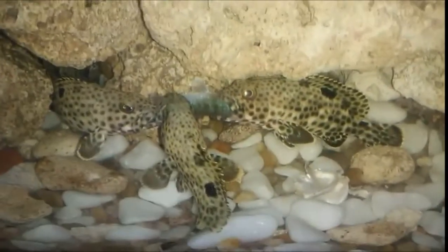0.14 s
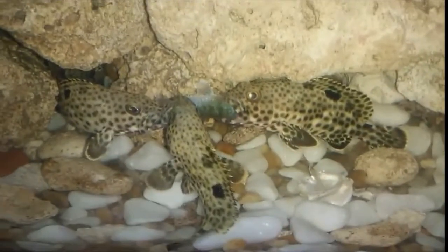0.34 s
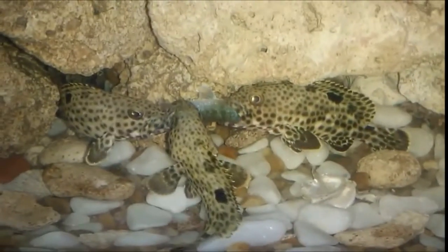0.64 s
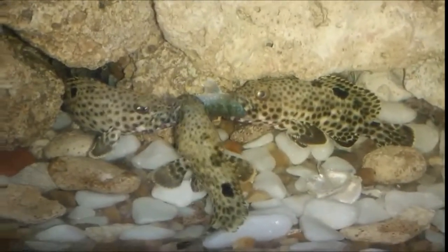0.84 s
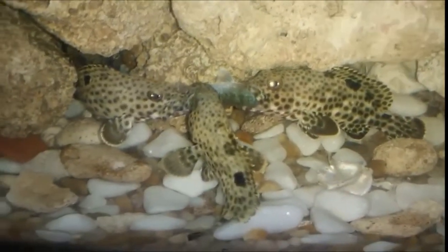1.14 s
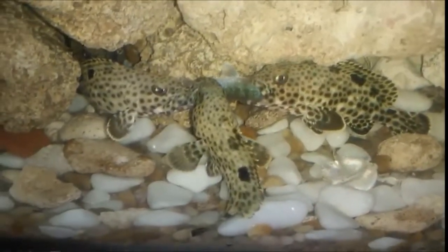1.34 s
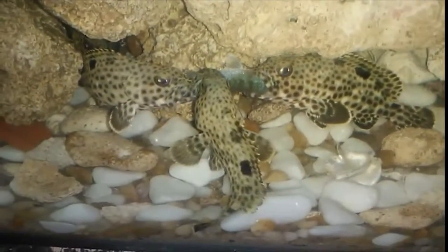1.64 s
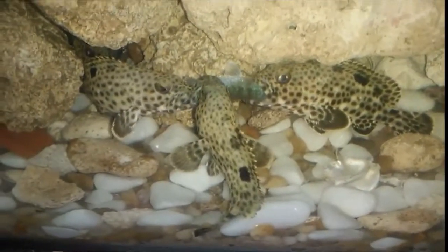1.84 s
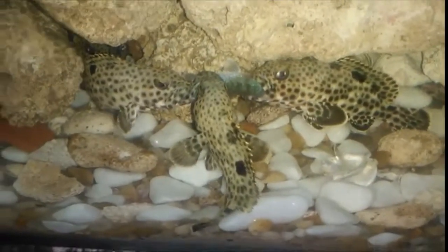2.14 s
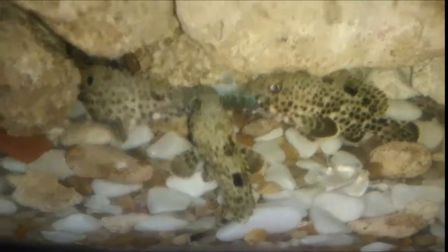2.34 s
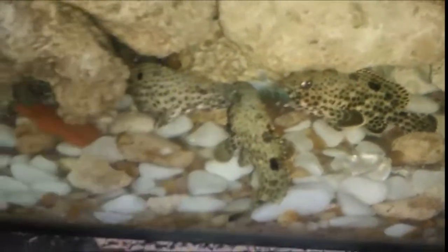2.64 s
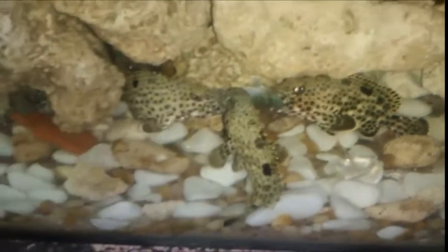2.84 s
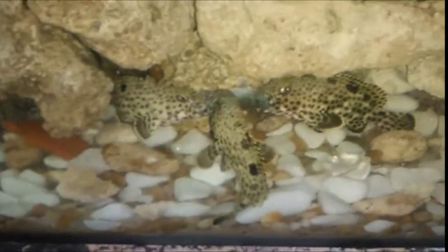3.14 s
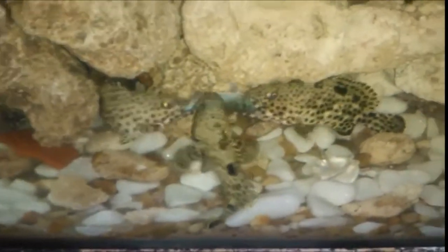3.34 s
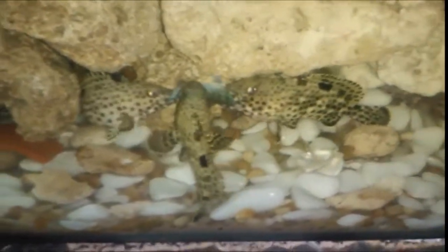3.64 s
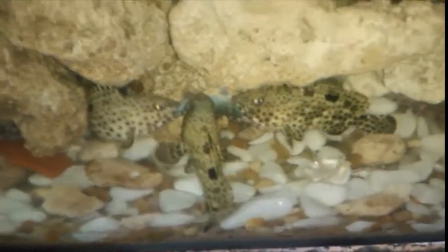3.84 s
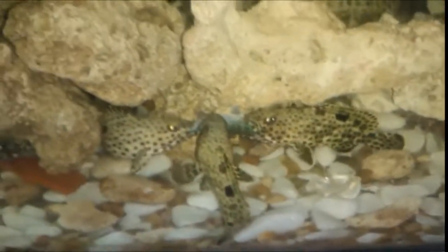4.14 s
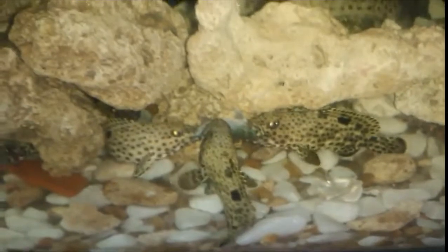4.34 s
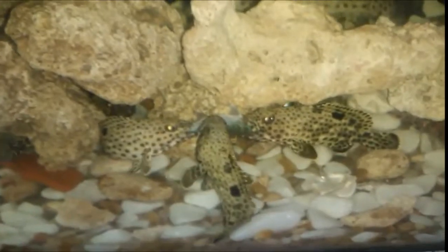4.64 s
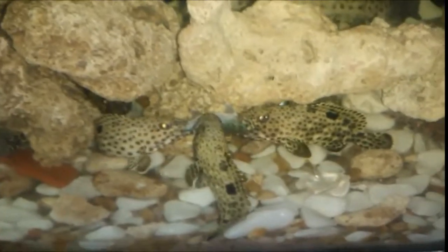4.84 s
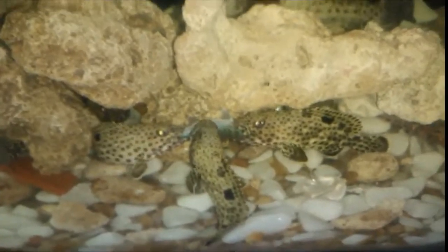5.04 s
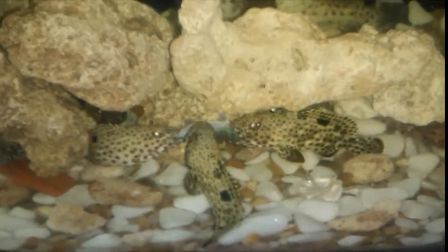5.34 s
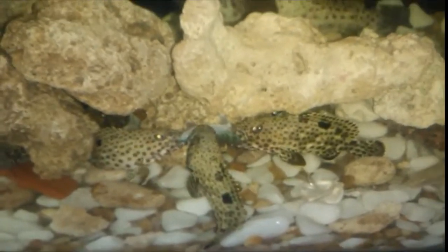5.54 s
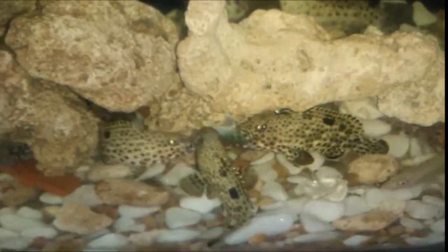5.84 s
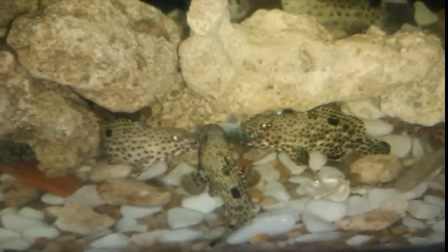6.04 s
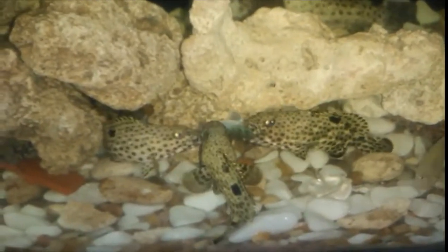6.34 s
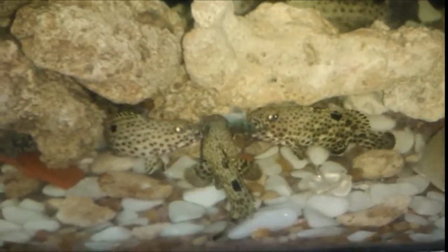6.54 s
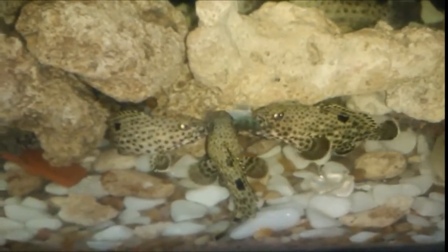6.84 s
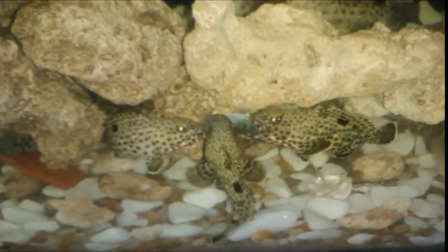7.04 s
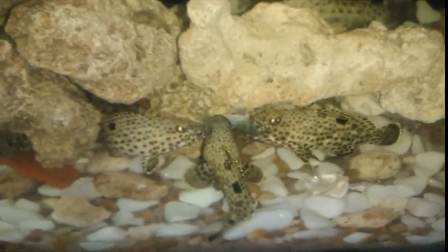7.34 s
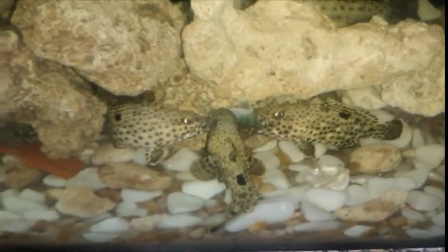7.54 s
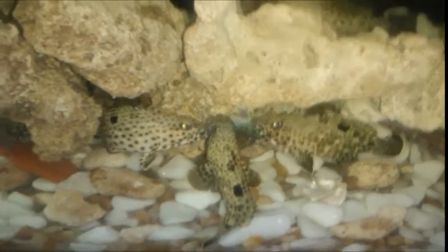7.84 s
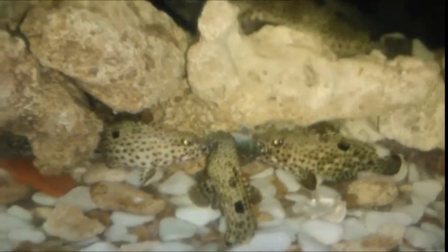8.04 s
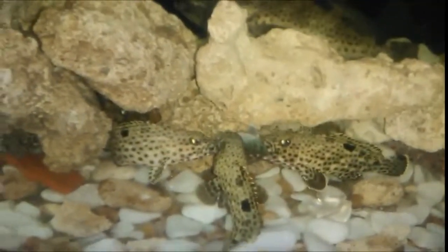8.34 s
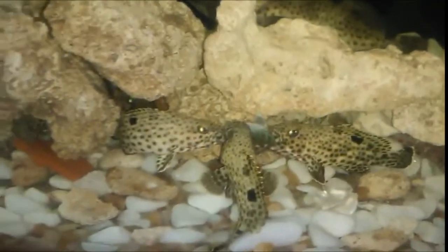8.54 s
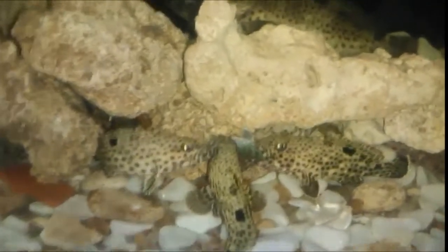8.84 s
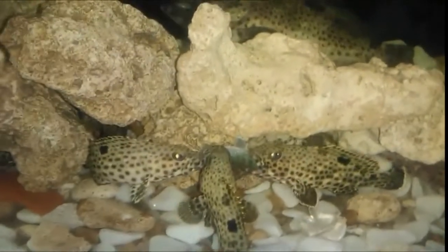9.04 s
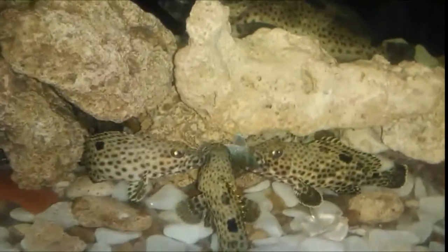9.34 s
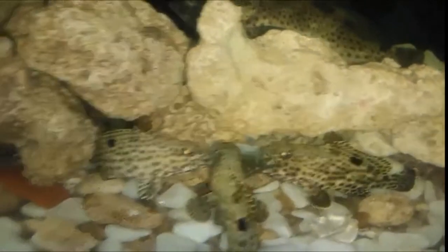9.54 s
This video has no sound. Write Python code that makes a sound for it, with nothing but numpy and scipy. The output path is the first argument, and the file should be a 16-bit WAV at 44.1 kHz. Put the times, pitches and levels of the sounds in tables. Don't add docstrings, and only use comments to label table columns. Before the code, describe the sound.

Aquarium filter water gurgles, trickles and splashes in a repeating short loop, left side only, with two silent gaps and one much louder pass.

```python
import sys
import numpy as np
from scipy import signal
from scipy.fft import rfft, irfft
from scipy.io import wavfile
from scipy.ndimage import uniform_filter1d, map_coordinates

SR = 44100
rng = np.random.default_rng(int(sys.argv[2]) if len(sys.argv) > 2 else 0)


def master(y):
    cut = np.clip(np.atleast_2d(y).T, -1, 1)
    pcm = np.round(cut * 32767)
    wavfile.write(sys.argv[1], SR, pcm.astype(np.int16))


def field_ratio(decibels):
    return 10 ** (np.asarray(decibels, dtype=float) / 20)


N = 426888
START, LENGTH = 6.55667, 1.8
M = round(LENGTH * SR)
T = np.arange(M) / SR

# start in seconds, gain in dB.
PASTES = [
    (-.94333, -9.5),
    (1.02334, -9.55),
    (2.65667, -9.55),
    (4.45667, -9.55),
    (6.55667, 0),
    (8.35667, -9.5),
]
# time in seconds, strength in dB, fineness in dB (small bubbles gain on large ones).
FLOW = [(6.56, -45.5, 0), (6.66, -47.5, -1), (6.74, -46, 1), (6.79, -45, 0.5), (6.82, -46, 2),
        (6.94, -46.5, -1), (7.1, -46.5, 0), (7.27, -46.5, 1.5), (7.335, -45.5, -1.5), (7.395, -47.5, -2.5),
        (7.455, -46, 1), (7.55, -46.5, -1.5), (7.75, -44.5, 0.5), (7.98, -47.5, -0.5), (8.12, -45, 0.5),
        (8.215, -45, -0.5), (8.29, -45.5, -1), (8.35, -45, 0.5)]
# time in seconds, top pitch in Hz, sag in Hz per second, spray level in dB.
TOP_STEPS = [(6.55, 4190, 100, 0), (6.665, 4500, 1180, 2), (6.809, 4350, 2400, 2), (6.993, 4430, 1500, -4.5),
             (7.24, 4640, 4500, -0.5), (7.311, 4765, 4440, 1.5), (7.44, 4160, 2500, 0.5),
             (7.495, 4420, 2560, 2.5), (7.592, 4810, 3510, -3.5), (7.702, 4820, 2500, -10.5),
             (7.771, 4543, 1700, 4.5), (8.04, 4450, 480, -0.5), (8.194, 4560, 300, 5)]
# middle in seconds, half length in seconds, loss in dB.
LULLS = [
    (6.662, 0.18, 1.5),
    (7.048, 0.11, 5),
    (7.244, 0.064, 4.5),
    (7.898, 0.059, 3),
    (8.219, 0.098, 1.5),
]

# frequency in Hz, density in dB per Hz.
GURGLE_COLOUR = [(165, -68), (185, -11), (250, -8.5), (330, -7), (500, -3.5), (637, -4), (850, -2.5),
                 (950, -23.5), (1100, -44)]
# frequency in Hz, density in dB per Hz.
TRICKLE_COLOUR = [(750, -45.5), (880, -12.5), (1000, -2.5), (1300, 0), (1600, -1.5), (1700, -18),
                  (1850, -43.5)]
# frequency in Hz, density in dB per Hz.
SPLASH_COLOUR = [(1450, -37.5), (1600, -7.5), (1860, -6), (2410, -5.5), (2800, -2), (3070, -7),
                 (3450, -4.5), (3600, -13), (3800, -47.5)]
# frequency in Hz, density in dB per Hz.
SPRAY_COLOUR = [(3400, -39), (3600, -5.5), (4160, -4.5), (4500, -14.5), (5200, -4), (5400, -61)]
# frequency in Hz, density in dB per Hz.
HISS_COLOUR = [(25, 0), (60, 2), (100, 4), (150, 8.5), (300, 8.5), (5000, 5.5), (9000, -3.5), (15700, -8),
               (16500, -41)]

# start in seconds,
# peak in dB, pitch in Hz, 60 dB decay in seconds.
DROPS = [(6.662, -28, 2626, 0.03), (6.675, -41.5, 2694, 0.12), (6.706, -29, 3240, 0.015),
         (6.707, -35, 3940, 0.033), (6.808, -34.4, 3240, 0.03), (6.812, -27.5, 3870, 0.015),
         (6.821, -29.5, 3690, 0.012), (7.147, -29, 2668, 0.03), (7.153, -22.5, 2767, 0.016),
         (7.246, -39.5, 3425, 0.06), (7.306, -37.5, 2693, 0.06), (7.312, -26, 2660, 0.015),
         (7.317, -32, 2910, 0.034), (7.318, -44, 3400, 0.13), (7.325, -39.5, 3890, 0.03),
         (7.333, -30, 2550, 0.015), (7.44, -40.5, 3590, 0.067), (7.487, -35.5, 3574, 0.017),
         (7.497, -39.5, 2993, 0.12), (7.589, -29, 3020, 0.015), (7.591, -25.5, 2788, 0.013),
         (7.609, -28.5, 3050, 0.03), (7.613, -24.5, 2800, 0.013), (7.642, -44, 3240, 0.12),
         (7.642, -37, 2982, 0.12), (7.647, -28, 2734, 0.03), (7.648, -20.5, 3094, 0.015),
         (7.649, -38.5, 3596, 0.06), (7.65, -28.5, 3262, 0.03), (7.653, -36, 3860, 0.015),
         (7.656, -41, 3530, 0.06), (7.695, -39, 3184, 0.12), (7.7, -35, 2562, 0.06),
         (7.6995, -25, 3150, 0.012), (7.7, -34.5, 3700, 0.017), (7.701, -35.5, 2971, 0.11),
         (7.702, -39.5, 2827, 0.12), (7.713, -44, 3305, 0.1), (7.722, -38, 3074, 0.13),
         (7.774, -40, 3552, 0.03), (7.826, -27.5, 2820, 0.014), (8.089, -43, 2906, 0.11),
         (8.097, -37.5, 3460, 0.03), (8.112, -40.5, 3420, 0.06), (8.18, -39.5, 2725, 0.06),
         (8.22, -42.5, 3860, 0.015), (8.284, -34.5, 3880, 0.015), (8.308, -39.5, 3930, 0.032),
         (8.349, -27, 2551, 0.015), (8.349, -25, 2970, 0.014),
         (6.601, -36, 2440, 0.028), (6.607, -40.5, 1953, 0.11), (6.617, -30, 2490, 0.015),
          (6.664, -35, 2340, 0.012), (6.665, -34, 2580, 0.012), (6.877, -32.5, 1810, 0.014),
          (6.925, -39.5, 2020, 0.03), (7.097, -31, 2550, 0.017), (7.147, -28.5, 2335, 0.017),
          (7.154, -32, 2420, 0.013), (7.239, -41.5, 1916, 0.12), (7.248, -43.5, 2350, 0.12),
          (7.307, -34.5, 2210, 0.018), (7.309, -29.2, 1793, 0.028), (7.311, -30.5, 2440, 0.035),
          (7.311, -26.5, 2092, 0.035), (7.317, -45, 1950, 0.042), (7.321, -38.5, 1716, 0.026),
          (7.331, -31.5, 2340, 0.012), (7.335, -37, 1842, 0.051), (7.341, -29.5, 2230, 0.018),
          (7.342, -37, 1720, 0.066), (7.353, -45, 1810, 0.12), (7.517, -42, 1754, 0.11),
          (7.576, -44, 1885, 0.12), (7.647, -34.5, 2510, 0.015), (7.649, -32, 1710, 0.015),
          (7.651, -34, 2280, 0.013), (7.7, -33.5, 2200, 0.012), (7.701, -42.5, 2260, 0.099),
          (7.704, -33.5, 2497, 0.012), (7.712, -33, 1790, 0.03), (7.719, -50.5, 2016, 0.076),
          (7.75, -36, 1720, 0.033), (7.91, -38, 1840, 0.036), (7.947, -36, 1970, 0.039),
          (8.042, -36.5, 1740, 0.1), (8.05, -40.5, 1626, 0.077), (8.052, -29.5, 2020, 0.017),
          (8.054, -42.6, 1478, 0.06), (8.074, -39.5, 1560, 0.03), (8.082, -44, 1736, 0.11),
          (8.128, -46, 1930, 0.12), (8.148, -33, 2326, 0.025), (8.151, -28, 2120, 0.016),
          (8.167, -31, 1630, 0.015), (8.25, -38, 2220, 0.015), (8.304, -43.5, 1775, 0.053),
          (8.347, -30.5, 2331, 0.047), (8.35, -39.5, 1556, 0.03),
         (6.664, -36, 2870, 0.03), (6.732, -50, 2500, 0.11), (6.742, -40, 2690, 0.06),
           (6.748, -46.5, 3135, 0.12), (6.81, -41, 1890, 0.068), (6.828, -36, 3920, 0.017),
           (6.897, -36, 3640, 0.015), (7.094, -42.5, 2533, 0.15), (7.095, -47, 1590, 0.04),
           (7.153, -36, 2310, 0.013), (7.166, -47.5, 2330, 0.1), (7.175, -47, 1930, 0.12),
           (7.247, -39, 3830, 0.033), (7.264, -34.5, 2790, 0.028), (7.308, -39, 1600, 0.031),
           (7.311, -29.5, 2570, 0.015), (7.333, -34, 2570, 0.0097), (7.345, -31.5, 2620, 0.013),
           (7.347, -37, 2860, 0.022), (7.349, -48, 2153, 0.098), (7.363, -39.5, 1870, 0.06),
           (7.595, -40, 3230, 0.06), (7.615, -37.5, 2497, 0.015), (7.619, -33.5, 2874, 0.038),
           (7.661, -48.5, 3800, 0.14), (7.662, -37.5, 2540, 0.011), (7.665, -27.5, 3090, 0.02),
           (7.67, -37, 3550, 0.03), (7.678, -37.5, 2885, 0.06), (7.713, -42, 2860, 0.11),
           (7.742, -31.8, 3110, 0.015), (7.747, -50, 2420, 0.11), (7.754, -33.5, 2740, 0.014),
           (7.777, -46, 2856, 0.085), (7.785, -40.5, 3720, 0.015), (7.844, -44.5, 1710, 0.06),
           (7.888, -42.5, 3393, 0.1), (8.014, -43, 1480, 0.03), (8.088, -41.5, 3135, 0.14),
           (8.111, -33.5, 2910, 0.032), (8.117, -31, 1670, 0.015), (8.157, -41, 1984, 0.027),
           (8.2, -41, 1944, 0.03), (8.202, -42, 1450, 0.027), (8.207, -47.5, 2835, 0.09),
           (8.239, -38, 2230, 0.034), (8.258, -40.5, 3460, 0.036), (8.349, -29, 2805, 0.028),
           (8.352, -38, 2450, 0.017), (8.354, -33.5, 3595, 0.02)]
# start in seconds, peak in dB, pitch in Hz, 60 dB decay in seconds.
GULPS = [(6.633, -43.5, 955, 0.15), (6.647, -53, 374, 0.2), (6.658, -49, 1010, 0.12),
         (6.663, -47, 1150, 0.17), (6.736, -35, 639, 0.11), (6.737, -51, 1242, 0.17),
         (6.738, -35.5, 848, 0.034), (6.742, -41, 956, 0.18), (6.752, -47.5, 362.5, 0.17),
         (6.762, -47, 892, 0.2), (6.768, -37, 776, 0.015), (6.784, -60.5, 523, 0.2),
         (6.826, -49, 1340, 0.12), (6.908, -48.5, 1139, 0.39), (7.33, -47.5, 612, 0.12),
         (7.331, -40.5, 955, 0.042), (7.334, -42, 1072, 0.18), (7.35, -41, 996, 0.11),
         (7.353, -42.5, 631, 0.17), (7.383, -49.5, 486, 0.22), (7.455, -51, 1240, 0.11),
         (7.504, -45.5, 656, 0.12), (7.584, -44.5, 788, 0.055), (7.622, -46.5, 728, 0.22),
         (7.657, -36.5, 643, 0.06), (7.748, -38.5, 637, 0.19), (7.751, -36, 964, 0.041),
         (7.77, -55, 355, 0.16), (7.77, -39, 1123, 0.038), (7.777, -42.5, 652, 0.22),
         (7.794, -36, 890, 0.023), (7.804, -45, 681, 0.16), (7.985, -41, 637, 0.07),
         (8.035, -46.5, 939, 0.2), (8.048, -43, 1046, 0.055), (8.049, -39, 1396, 0.03),
         (8.05, -35.5, 647, 0.055), (8.062, -40, 1009, 0.22), (8.074, -47, 1170, 0.2),
         (8.077, -49.5, 547, 0.16), (8.127, -36.5, 1257, 0.026), (8.163, -52, 1393, 0.2),
         (8.183, -41.5, 622, 0.29), (8.183, -34, 795, 0.033), (8.194, -33, 720, 0.06),
         (8.201, -49.5, 1304, 0.12), (8.201, -35.5, 620, 0.027), (8.291, -44, 1001, 0.12),
         (8.352, -43, 600, 0.02), (8.345, -23.5, 700, 0.019)]
# start in
# seconds, peak in dB, pitch in Hz, 60 dB decay in seconds.
FLECKS = [(6.667, -43, 4090, 0.06), (6.672, -64, 4600, 0.12), (6.81, -55, 4560, 0.039),
          (6.997, -65, 4600, 0.072), (6.994, -50, 4110, 0.12), (7.11, -54.5, 3990, 0.12),
          (7.242, -50, 4210, 0.043), (7.315, -56, 4360, 0.12), (7.318, -44, 4170, 0.06),
          (7.32, -52, 4550, 0.03), (7.326, -59, 4320, 0.03), (7.333, -44, 4360, 0.03),
          (7.343, -40.5, 4130, 0.03), (7.346, -58, 4520, 0.03), (7.347, -54, 4370, 0.03),
          (7.5, -56.4, 4140, 0.12), (7.595, -58.5, 4530, 0.06), (7.595, -54, 4110, 0.06),
          (7.642, -56.5, 4435, 0.06), (7.702, -56, 4565, 0.03), (7.704, -52, 4320, 0.06),
          (7.777, -50, 4190, 0.03), (7.784, -59, 4280, 0.03), (8.144, -43.5, 4290, 0.03),
          (8.199, -56.5, 4600, 0.12), (8.2, -55, 4360, 0.06), (8.203, -60, 4860, 0.06),
          (8.218, -66.4, 5146, 0.03), (8.218, -59.5, 4850, 0.03), (8.219, -59, 4770, 0.06),
          (8.221, -46, 4600, 0.06), (8.231, -61, 4306, 0.12), (8.235, -56.5, 4780, 0.034),
          (8.24, -53, 4370, 0.03), (8.255, -51, 4690, 0.067), (8.258, -52, 4420, 0.03),
          (8.259, -67, 4930, 0.12), (8.259, -50.5, 4450, 0.03), (8.282, -57, 4694, 0.03),
          (8.284, -55, 4670, 0.12), (8.284, -55, 4420, 0.03), (8.316, -48.5, 4110, 0.06),
          (8.323, -53, 4640, 0.03)]
# start in seconds, peak in dB, pitch in Hz, 60 dB decay in
# seconds.
HIGH_TONES = [(6.761, -74.8, 6933, 0.066), (6.762, -72, 7000, 0.03), (6.882, -75, 5329, 0.03),
              (6.893, -73, 5640, 0.06), (6.895, -82, 5211, 0.12), (6.898, -73, 6890, 0.06),
              (7.103, -85, 11627, 0.12), (7.19, -68.5, 8354, 0.06), (7.192, -57.5, 7800, 0.033),
              (7.191, -72, 5160, 0.036), (7.7, -88.5, 15270, 0.12), (7.193, -58, 8050, 0.03),
              (7.213, -68.5, 8050, 0.06), (7.217, -66, 7840, 0.06), (7.22, -68, 7650, 0.06),
              (7.232, -68, 8118, 0.06), (7.246, -68, 7870, 0.03), (7.402, -67, 7547, 0.06),
              (7.403, -53.5, 6560, 0.035), (7.423, -67.5, 6400, 0.13), (7.434, -64.5, 7570, 0.034),
              (7.481, -70.7, 5440, 0.12), (7.521, -67, 5720, 0.034), (7.529, -72.5, 5420, 0.14),
              (7.556, -68, 5700, 0.14), (7.561, -78, 6599, 0.12), (7.563, -68.5, 5500, 0.053),
              (7.755, -77.5, 5900, 0.12), (7.593, -64, 5800, 0.099), (7.609, -71, 5840, 0.06),
              (7.824, -78, 8260, 0.06), (7.83, -84, 9150, 0.065), (7.855, -84, 9600, 0.06),
              (7.931, -76.5, 8484, 0.06), (8.041, -70, 7000, 0.03), (8.041, -58, 6200, 0.034),
              (8.057, -69.5, 6290, 0.068), (8.12, -73, 8160, 0.12), (8.121, -70.5, 7902, 0.13),
              (8.192, -67.5, 7270, 0.12), (8.21, -68.5, 6500, 0.03), (8.211, -72, 7140, 0.03),
              (8.211, -59.5, 7370, 0.055), (8.212, -71.5, 5460, 0.12), (8.213, -68.5, 7580, 0.06),
              (8.221, -72.5, 5730, 0.06), (8.229, -69.5, 5470, 0.06), (8.237, -71, 7410, 0.14),
              (8.332, -71, 5600, 0.13), (8.341, -62, 7280, 0.093)]

# frequency in Hz, rms level in dB.
HUM = [(120, -86.5), (180, -79.5), (300, -71.5), (360, -67), (420, -75.5), (540, -68), (1620, -79),
       (1920, -68), (2820, -67)]
# frequency in Hz, width in Hz, rms level in dB.
PIPE_MODES = [(632, 10, -68), (955, 7.8, -68.5), (919, 13, -70.5), (1745, 21, -68.5), (3014, 150, -58),
              (4640, 18, -83)]


def unit(x):
    return x / np.sqrt(np.mean(x ** 2) + 1e-20)


def wobble(rate):
    knots = rng.standard_normal(int(M * rate / SR) + 4)
    return map_coordinates(knots, [T * rate])


def coloured(x, spectrum):
    f, db = np.transpose(spectrum)
    hz = np.fft.rfftfreq(len(x), 1 / SR)
    curve_db = np.interp(np.log(hz + 1), np.log(f + 1), db, left=-150, right=-150)
    return unit(irfft(rfft(x) * field_ratio(curve_db), len(x)))


def patchy(depth_db):
    z = signal.stft(rng.standard_normal(M + 512), nperseg=256)[2]
    field = uniform_filter1d(rng.standard_normal(z.shape), 3, 0)
    field = uniform_filter1d(field, 5, 1)
    return signal.istft(z * field_ratio(depth_db * unit(field)), nperseg=256)[1][:M]


def bubbles(s, db, hz, t60, rise, attack, size):
    t = np.arange(size) / SR
    s, db, hz, t60 = (np.asarray(v)[:, None] for v in (s, db, hz, np.abs(t60) + 1e-4))
    envelope = field_ratio(db - 60 * t / t60) * (1 - np.exp(-t / attack))
    ring = envelope * np.sin(2 * np.pi * hz * t * (1 + rise * t / t60))
    at = np.clip(np.round(s * SR).astype(int) + np.arange(size), 0, M)
    return np.bincount(at.ravel(), ring.ravel(), M + 1)[:M]


def listed(rows, gain_db, attack):
    s, db, hz, t60 = np.transpose(rows)
    return bubbles(s - START, db + gain_db, hz, t60, rise=0, attack=attack, size=6000)


def swarm(spectrum, hz, spread, cycles, scatter_db, noise, count):
    start = rng.random(count) * LENGTH
    pitch = hz * np.exp(spread * rng.standard_normal(count))
    level_db = scatter_db * np.minimum(rng.exponential(size=count), 4)
    grains = bubbles(start, level_db, pitch, cycles / pitch, rise=0.14, attack=0.00029, size=700)
    flat = unit(grains - np.mean(grains))
    return coloured(flat + noise * patchy(depth_db=3.0), spectrum)


def top_and_spray(t):
    s, top_hz, sag, spray_db = np.transpose(TOP_STEPS)
    latest = np.clip(np.searchsorted(s, t + START) - 1, 0, None)
    since = t + START - s[latest]
    spray_fade = 18
    return top_hz[latest] - sag[latest] * since, spray_db[latest] - spray_fade * since


def lull(t):
    return sum(db * np.exp(-((t + START - at) / half) ** 4) for at, half, db in LULLS)


def glass_room(x, t60):
    t = np.arange(SR // 5) / SR
    tail = rng.standard_normal(len(t)) * field_ratio(-60 * t / t60)
    room_db = -8
    return x + field_ratio(room_db) * signal.fftconvolve(x, tail / np.linalg.norm(tail))[:M]


def narrow_band(x):
    hz, t, z = signal.stft(x, SR, nperseg=512, noverlap=384)
    ragged_hz = 100 * unit(uniform_filter1d(rng.standard_normal(z.shape), 14, 1))
    above_hz = hz[:, None] - top_and_spray(t)[0]
    edge = field_ratio(-45 * np.clip((above_hz + ragged_hz + 110) / 120, 0, 1))
    valley_db = (1 + 2.5 * lull(t)) * np.exp(-((above_hz + 545) / 140) ** 2)
    return signal.istft(z * edge * field_ratio(-valley_db), SR, nperseg=512, noverlap=384)[1][:M]


def low_cut(x):
    sos = signal.butter(5, 215, "high", fs=SR, output="sos")
    forward = signal.sosfilt(sos, x)
    return signal.sosfilt(sos, forward[::-1])[::-1]


def cut(piece):
    head, end = T / 0.00015, (LENGTH - T) / 0.00015
    kick = lambda u: (1 - u) * np.exp(-u)
    faded = piece * (1 - np.exp(-head) - np.exp(-end / 2.4))
    return faded + field_ratio(-40.5) * kick(head) - field_ratio(-41.5) * kick(end)


def hiss():
    return field_ratio(-78.0) * coloured(patchy(depth_db=-2.0), HISS_COLOUR)


def tick():
    t = np.arange(N) / SR - 5.224
    sos = signal.butter(1, [5200, 6400], "band", fs=SR, output="sos")
    thin = signal.sosfilt(sos, rng.standard_normal(N))
    return field_ratio(-55) * np.exp(-(t / 0.0013) ** 2) * thin


def pump():
    hum = np.zeros(M)
    for hz, db in HUM:
        level = np.sqrt(2) * field_ratio(db + 5 + 0.33 * wobble(8.4))
        hum += level * np.sin(2 * np.pi * (hz * T + rng.random()))
    return hum


def knock(snap_db=-18, snap_hz=1680, rebound_db=-25, rebound_hz=430):
    t = T + START - 8.27756
    snap = field_ratio(snap_db) * np.exp(-(t / 0.00033) ** 2) * np.cos(2 * np.pi * snap_hz * t - 0.8)
    late = np.maximum(t - 0.00037, 0)
    return snap - field_ratio(rebound_db - 60 * late / 0.012) * np.sin(2 * np.pi * rebound_hz * late)


def pipe():
    hz = np.fft.rfftfreq(M, 1 / SR)
    ringing = np.zeros(M)
    for centre, width, db in PIPE_MODES:
        resonance = 1j * hz * width / (centre * centre - hz * hz + 1j * hz * width)
        ring = unit(irfft(rfft(rng.standard_normal(M)) * resonance, M))
        ringing += field_ratio(db + 2.0 - 0.98 * lull(T) + 2.4 * wobble(12)) * ring
    return ringing


def sparkle():
    thin_tones = listed(HIGH_TONES, 2.5, attack=0.0012) * (0.88 + 0.39 * wobble(170))
    return listed(FLECKS, -0.5, attack=0.0017) + glass_room(thin_tones, t60=0.4)


def drops():
    small = listed(DROPS, -0.5, attack=0.00082)
    return small + listed(GULPS, -2, attack=0.0014)


def stream():
    s, strength, fine = np.transpose(FLOW)
    strength, fine = np.interp(T + START, s, strength), np.interp(T + START, s, fine)
    gurgle_db = strength - 7 - fine
    trickle_db = 0.57 * (strength + 46) - 45.5 - 8.5 + 0.4 * fine - lull(T)
    splash_db = strength - 2 + fine
    spray_db = strength - 10.5 + top_and_spray(T)[1]
    gurgle = swarm(GURGLE_COLOUR, hz=483.3, spread=0.484, cycles=22, scatter_db=0.5, noise=5.8, count=500)
    trickle = swarm(TRICKLE_COLOUR, hz=1191, spread=0.25, cycles=28, scatter_db=-1.0, noise=6.1, count=600)
    splash = swarm(SPLASH_COLOUR, hz=2428, spread=0.3135, cycles=21.3, scatter_db=1.5, noise=3.2, count=1800)
    spray = coloured(patchy(depth_db=3.0), SPRAY_COLOUR)
    falling = field_ratio(gurgle_db) * gurgle + field_ratio(trickle_db) * trickle + field_ratio(splash_db) * splash
    return falling + field_ratio(spray_db) * spray


def scene():
    water = narrow_band(stream() + pipe() + glass_room(drops(), t60=0.81) + knock())
    piece = low_cut(cut(water + sparkle())) + pump() + hiss()
    left = np.zeros(N + 4 * SR)
    for s, db in PASTES:
        left[SR + round(s * SR):][:M] += field_ratio(db) * piece
    return np.array([2 * left[SR:SR + N] + tick(), np.zeros(N)])


def top_cut(x):
    return signal.sosfilt(signal.butter(12, 15720, fs=SR, output="sos"), x)


def record(dry):
    return top_cut(dry)


dry = scene()
out = record(dry)
master(out)
```